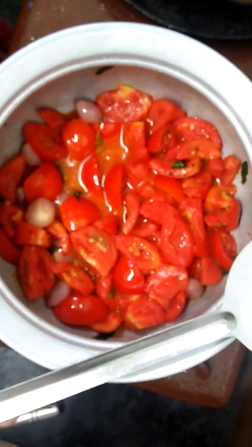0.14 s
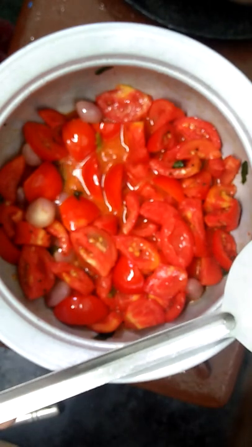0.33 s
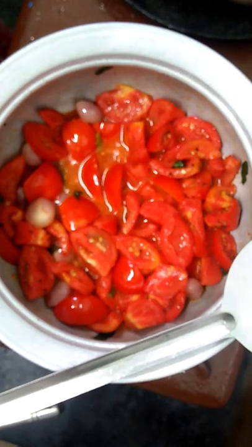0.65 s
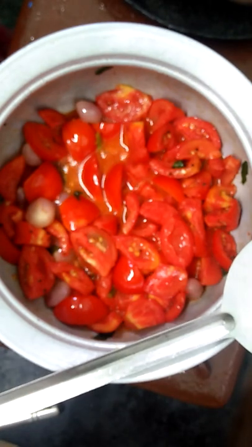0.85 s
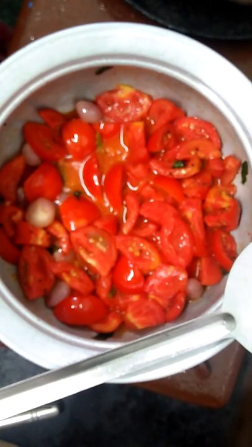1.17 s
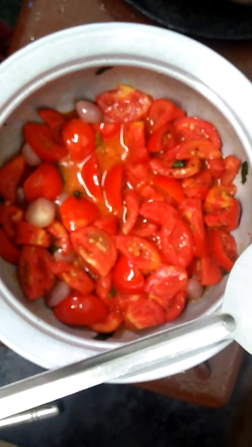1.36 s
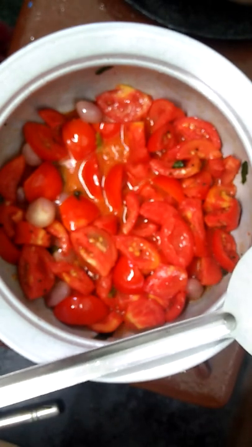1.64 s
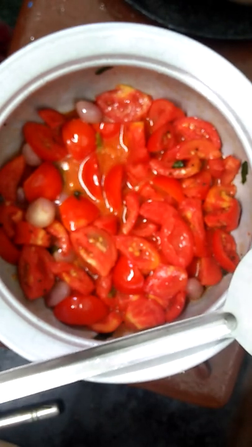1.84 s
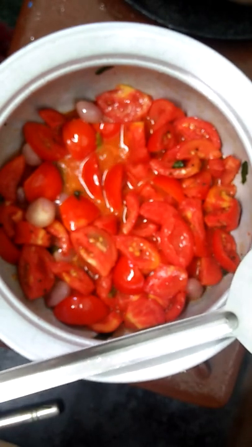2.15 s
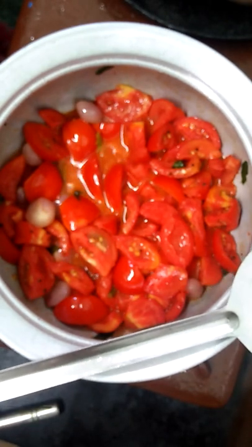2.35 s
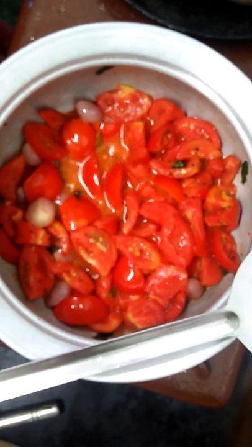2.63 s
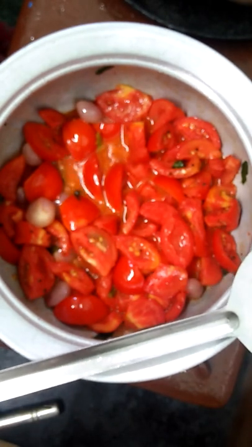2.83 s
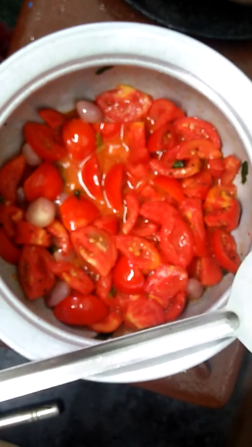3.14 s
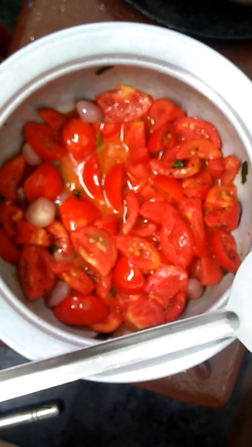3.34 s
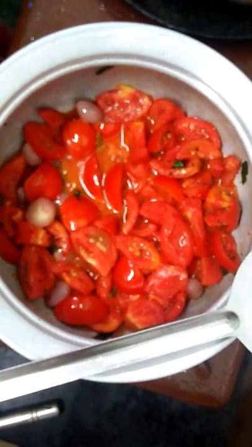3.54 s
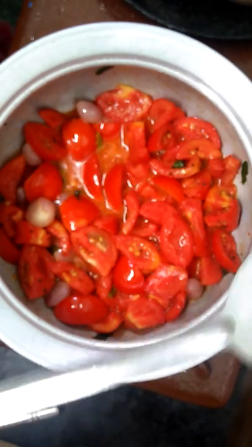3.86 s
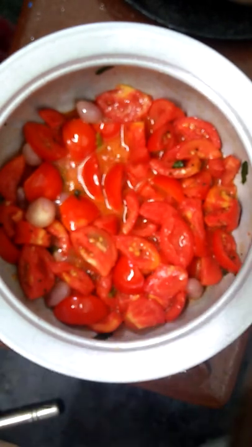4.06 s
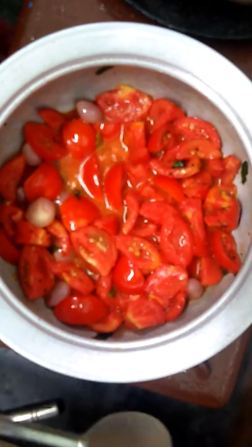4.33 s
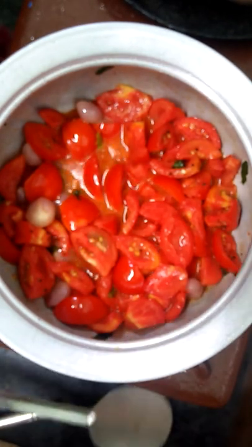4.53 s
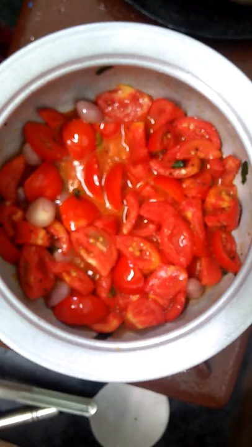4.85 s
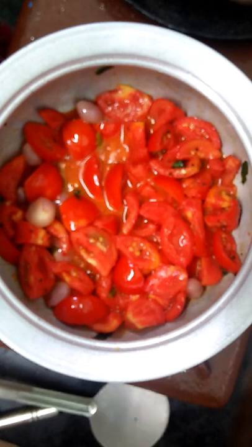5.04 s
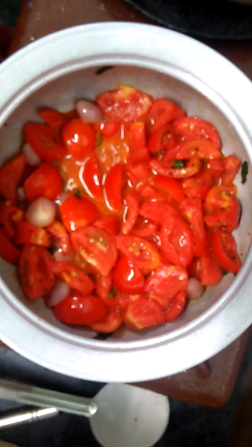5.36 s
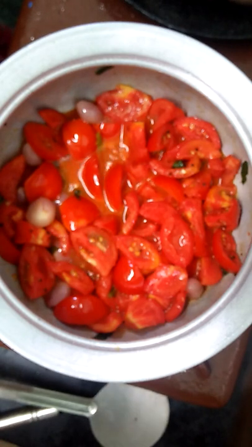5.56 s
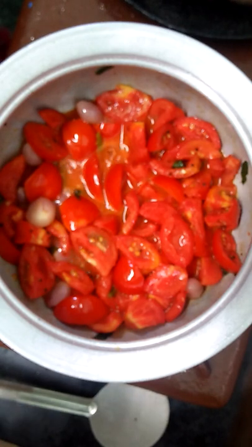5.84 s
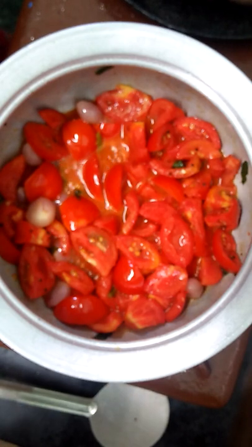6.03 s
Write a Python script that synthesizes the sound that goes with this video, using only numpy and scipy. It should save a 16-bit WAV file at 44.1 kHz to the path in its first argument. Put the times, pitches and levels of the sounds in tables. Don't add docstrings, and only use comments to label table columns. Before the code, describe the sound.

A metal ladle clinks on a pot rim, crows caw outside, then steel clatters onto a stone counter in an echoing kitchen.

```python
import sys
import numpy as np
from scipy import signal
from scipy.fft import rfft, irfft
from scipy.io import wavfile
from scipy.ndimage import uniform_filter1d

SR = 44100
rng = np.random.default_rng(int(sys.argv[2]) if len(sys.argv) > 2 else 0)


def master(y):
    cut = np.clip(np.atleast_2d(y).T, -1, 1)
    pcm = np.round(cut * 32767)
    wavfile.write(sys.argv[1], SR, pcm.astype(np.int16))


def to_linear_factor(level_db):
    exponent = np.asarray(level_db, float) / 20
    return 10 ** exponent


N = 273002

# f/Hz, level/dB per Hz
CRACK = [(180, -44.5), (300, -22), (353, -23.5), (573, -7.5), (1010, -7.5), (1250, -7.5), (2590, -4),
         (3630, -7.5), (9610, 4), (14400, -6)]
# f/Hz, level/dB per Hz
DULL_CRACK = [(360, -24.5), (450, -2.5), (700, 9), (1300, -6), (2400, -18), (3200, -37.5)]


def strike(hits, modes, damped_s, crack):
    out, t = np.zeros(N), np.arange(SR // 2) / SR
    for s, blow_db, chatter_s, crack_db in hits:
        fade = np.exp(-t[:SR // 5] / chatter_s)
        sound = np.zeros(len(t))
        for hz, db, t60 in modes:
            chosen = rng.random(len(fade)) < 400 / SR
            clicks = fade * chosen * rng.standard_normal(len(fade)) * 1.027
            clicks[0] = 1
            push = abs(clicks @ np.exp(2j * np.pi * hz * t[:len(fade)]))
            clicks /= np.sqrt(push + 0.22)
            longest = damped_s * min(1, 4000 / hz)
            swing_in = (1 - np.exp(-t * hz)) ** 2
            tone = np.sin(2 * np.pi * hz * t)
            twin = np.sin(2 * np.pi * hz * 1.006 * t) * 0.45
            ring = to_linear_factor(db - 0.5 - 60 * t / min(t60, longest)) * swing_in * (tone + twin)
            sound += signal.fftconvolve(clicks, ring)[:len(t)]
        sound[:len(fade)] += to_linear_factor(crack_db) * fade * coloured(crack, len(fade))
        start = round(s * SR)
        out[start:start + len(t)] += to_linear_factor(blow_db) * sound[:N - start]
    return out


def pot_clinks():
    # t/s, blow level/dB, chatter time/s, crack level/dB
    pot_hits = [
        (0.0, -41.5, 0.0093, 4),
        (.008, -44, 0.033, 7),
        (.031, -50, 0.0067, 8),
        (.043, -50.5, .02, 4),
        (.09, -59, 0.056, 10),
    ]
    thump_hits = [
        (.004, -61.5, 0.038, -43),
    ]
    lift_hits = [
        (3.889, -59, 0.036, -11),
    ]
    # f/Hz, level/dB, time to fall 60 dB/s
    pot_modes = [(1044.5, -7.5, 0.2), (1935, -5.5, 0.2), (2036, -1, .3), (2220, -11, 0.14), (2970, -4, .3),
                 (3890, -15.5, 0.23), (4146, -12.5, .25), (4275, -2, .25), (5330, -4.5, .3), (5814, -7, .3),
                 (6030, -12.5, .3), (6807, -8, .3), (7240, -8, .3), (8280, -6.5, .3), (8680, -3, .3),
                 (9130, -2, .3), (9390, -8, .3), (1515, -10, 0.17)]
    thump_modes = [(270.4, -3, 0.21), (316, -16.5, 0.092), (470, 4, 0.22), (626, -4.5, 0.033),
                   (743, -4, 0.033)]
    lift_modes = [(1288, -10, 0.083), (1642, -0.5, 0.059), (1755, -4.5, 0.11), (1990, 0, 0.102),
                  (2300, -2, 0.048), (2918, -3, .2), (3410, -14.5, 0.053)]
    # f/Hz, level/dB per Hz
    rim_crack = [(180, -45), (300, -12), (832, -14), (1010, -9), (2030, -6.5), (3630, -10), (4140, -7),
                 (4860, -14), (9000, -6), (14400, -24)]
    clinks = strike(pot_hits, pot_modes, .12, rim_crack)
    thump = strike(thump_hits, thump_modes, .2, DULL_CRACK)
    lift = strike(lift_hits, lift_modes, 0.063, rim_crack)
    return clinks + thump + lift


def resting():
    # t/s, blow level/dB, chatter time/s, crack level/dB
    rest_hits = [
        (4.703, -54, 0.002, -5),
        (4.711, -37, 0.002, -18),
        (4.724, -54, .03, 6.5),
        (4.757, -42, .002, -13),
    ]
    slide_hits = [
        (4.727, -56.5, 0.067, -10.5),
        (4.745, -57, 0.046, -8.5),
    ]
    # f/Hz, level/dB, time to fall 60 dB/s
    rest_modes = [(594.6, -4, 0.37), (566.6, -13.5, 0.04), (915, -14, 0.15), (1142, -16.5, 0.11),
                  (1443, -22.5, .1)]
    slide_modes = [(2190, -2, 0.2), (1380, -8.5, 0.13), (3640, -22.5, .25), (7610, -10.5, 0.11),
                   (8805, -5.5, 0.15), (9950, -10.5, .1), (11700, -13, 0.1), (12030, -12.5, .1)]
    touches = strike(rest_hits, rest_modes, .45, DULL_CRACK)
    soft = signal.sosfilt(signal.butter(4, 1700, fs=SR, output="sos"), touches)
    return soft + strike(slide_hits, slide_modes, 0.24, CRACK)


def stone_clatter():
    # t/s, blow level/dB, chatter time/s, crack level/dB
    drop_hits = [
        (4.786, -38, 0.034, 1),
        (4.806, -43, 0.027, 4),
        (4.826, -45.5, 0.041, -3),
        (4.88, -54.5, 0.032, -5),
    ]
    rock_hits = [
        (4.921, -44.5, 0.082, 0.0051),
        (4.934, -41.5, 0.051, 0.004),
        (4.95, -43.5, 0.047, 0),
        (4.972, -40.5, 0.012, 0.0026),
    ]
    # f/Hz, level/dB, time to fall 60 dB/s
    drop_modes = [(1008.5, -6.5, .3), (2580, -10, .2), (2770, -16.5, 0.084), (3964.5, -19, 0.13),
                  (5280, -16, .3), (7160, -17.5, .2), (7680, -9, .3), (8800, -5, .3), (9270, -3, .3),
                  (9840, -2, .3), (9950, 4.5, .4), (10240, -6.5, .3), (11460, -1.5, .3), (12100, 4.5, .3),
                  (12200, -7, .2), (13600, -9, .2)]
    rock_modes = [(891, -15.5, 0.044), (2120, -23.5, 0.12), (2706, -17, .25), (4056, -17, 0.074),
                  (4870, -12, 0.13), (6728, -2, .3), (6920, -15.5, .3), (7400, -2, .3), (7700, -11.5, .3),
                  (8700, -11.5, .2), (9020, -7.5, .2), (9260, -3, .2), (9520, -9.5, .2), (10500, -4, .2),
                  (11400, -9.5, .2), (12300, -7.5, .2), (12500, -3.5, .2), (13300, -11, .2)]
    return strike(drop_hits, drop_modes, 0.075, CRACK) + strike(rock_hits, rock_modes, 0.098, CRACK)


def small_ticks():
    # t/s, blow level/dB, chatter time/s, crack level/dB
    tick_hits = [
        (5.272, -56.5, 0.048, -8),
    ]
    tink_hits = [
        (5.423, -50.5, 0.027, -19),
        (5.74, -64, 0.0077, -18.5),
    ]
    scuff_hits = [
        (5.5, -81.5, 0.14, 4.5),
        (5.765, -70.5, 0.07, 2.2),
    ]
    # f/Hz, level/dB, time to fall 60 dB/s
    tick_modes = [(9390, 0, .1), (9600, 6.5, .1), (9100, 1, .1), (8800, -19, .1), (11000, -10, .1)]
    tink_modes = [(10160, 2, .3), (10350, -7, .2), (10090, -9, .2), (9800, -4, .2), (13890, -14, .1)]
    scuff_modes = [(2770, -7, .1), (1940, 0.5, 0.088)]
    # f/Hz, level/dB per Hz
    scuff_crack = [(1600, 6.5), (2400, 8), (3400, -5), (4500, -12)]
    tick = strike(tick_hits, tick_modes, 0.027, CRACK)
    tinks = strike(tink_hits, tink_modes, 0.067, CRACK)
    return tick + tinks + strike(scuff_hits, scuff_modes, .1, scuff_crack)


def hollow_knocks():
    # t/s, blow level/dB, chatter time/s, crack level/dB
    knock_hits = [
        (5.762, -60.5, 0.017, -8.5),
        (5.84, -57, 0.00365, 1),
        (5.881, -50, 0.011, 8),
        (5.905, -66, 0.015, -5),
        (6.018, -60, 0.011, -18),
    ]
    blip_hits = [
        (.924, -58.5, 0.0058, -15.5),
        (4.134, -70.5, 0.0089, -9),
        (5.28, -59.5, 0.026, -10),
    ]
    # f/Hz, level/dB, time to fall 60 dB/s
    knock_modes = [(446.7, -0.5, 0.4), (588, -1.5, 0.056), (640, -1, 0.058), (822, -18, 0.04),
                   (1125, 3.5, 0.0155), (1340, -5.5, 0.05), (1716, -15, 0.045), (2200, -14.5, 0.036),
                   (2605, -21, 0.036)]
    blip_modes = [(604, -1.4, 0.12), (926, -2, 0.022)]
    knocks = strike(knock_hits, knock_modes, 0.44, DULL_CRACK) + strike(blip_hits, blip_modes, 0.089, DULL_CRACK)
    return signal.sosfilt(signal.butter(4, 3000, fs=SR, output="sos"), knocks)


def crows():
    # t/s, level/dB, pitch f/Hz, throat scale (1 = usual)
    near_path = [
        (2.285, -66, 498, 0.96),
        (2.32, -53.5, 517, 1),
        (2.34, -55, 525.2, 1.0),
        (2.385, -48.5, 549.4, 1.01),
        (2.42, -50.5, 546, 1.02),
        (2.46, -53, 523.6, .99),
        (2.52, -53, 502.7, 0.98),
        (2.58, -63, 480.5, 0.96),
    ]
    hoarse_path = [
        (1.15, -72, 646, 1.07),
        (1.21, -51.5, 625, 1.14),
        (1.24, -51.5, 600, 1.09),
        (1.29, -52, 559, 1.06),
        (1.315, -60, 560.4, 1.03),
        (1.33, -55, 548.7, .99),
        (1.4, -66, 527, 0.95),
        (1.52, -72, 495.5, 0.93),
    ]
    # t/s, hold time/s, level/dB, throat scale
    far_calls = [
        (0.82, 0.06, -70.5, 0.88),
        (1.665, 0.017, -72.5, 0.945),
        (3.2, 0.043, -72.5, 0.93),
        (3.556, 0.087, -76, 0.96),
        (4.139, 0.17, -69.5, 1.0),
        (5.211, 0.24, -75, 0.97),
    ]
    # f/Hz, width/Hz, level/dB
    near_throat = [(1090, 520, -16), (1630, 390, 7.5), (2097, 455, 3.5), (2570, 460, -27),
                   (4000, 2100, -27)]
    hoarse_throat = [(780, 216, 3), (1080, 610, -3), (1640, 720, -2.5), (2380, 480, -0.5), (2830, 500, -23),
                     (4350, 670, -29.5)]
    far_throats = [
        [(2520, 860, -2), (3740, 490, -20)],
        [(2038, 150, 1.85), (2495, 660, -4)],
        [(1930, 200, 0), (2350, 590, 0)],
        [(1800, 230, -11), (1940, 250, -1)],
        [(900, 200, 0), (1870, 210, -8.5)],
        [(1860, 360, 2), (1182, 87, 8.5)],
    ]
    # t/s, swell level/dB
    near_bursts = [(2.304, 2.5), (2.319, 13), (2.342, 6), (2.363, 10), (2.372, 11), (2.393, 10.5),
                   (2.411, 8), (2.428, 7), (2.441, 14.5), (2.461, 7.5), (2.474, 7), (2.487, 10),
                   (2.505, -1), (2.517, 14), (2.54, 8), (2.547, -6), (2.56, 16)]
    hoarse_bursts = [(1.19, 5.5), (1.212, 4.2), (1.23, 5), (1.245, 6.5), (1.254, 6.6), (1.273, 7),
                     (1.288, 8.7), (1.302, 5), (1.328, 7.1), (1.336, 5.16), (1.349, 4.4), (1.361, 9),
                     (1.379, 5.5), (1.4, 3.9), (1.422, 6), (1.455, 5.2), (1.5, 5)]
    near = caw(near_path, near_throat, near_bursts, rough=.4)
    hoarse = caw(hoarse_path, hoarse_throat, hoarse_bursts, rough=.58)
    far = sum(caw(far_caw(*call), throat, [], rough=0.87) for call, throat in zip(far_calls, far_throats))
    return near + hoarse + far


def caw(rows, throat, bursts, rough):
    s, level_db, pitch_hz, scale = np.transpose(rows)
    t = np.arange(s[0], s[-1], 1 / SR)
    stretch = np.interp(t, s, scale)
    clock = np.cumsum(stretch)
    even = np.arange(int(clock[-1]))
    jitter = 1 + 0.056 * rough * drift(150, size=len(even))
    pitch = np.interp(even, clock, np.interp(t, s, pitch_hz) / stretch) * jitter
    phase = np.cumsum(pitch / SR)
    pulses = rms_one(np.diff(np.floor(phase), prepend=0))
    breath = rng.standard_normal(len(even)) * (phase % 1 < .5)
    source = (1 - rough) * pulses + rough * breath
    voice = np.interp(clock, even, resonate(source, throat))
    chest = signal.sosfiltfilt(signal.butter(2, 1900, fs=SR, output="sos"), voice)
    voice = voice - chest * np.clip(10.4 * (stretch - 1), 0, .8)
    edges = np.minimum(1, np.minimum(t - s[0], s[-1] - t) / 0.0046)
    out, start = np.zeros(N), round(s[0] * SR)
    out[start:start + len(t)] = rms_one(voice * throbs(bursts, t)) * to_linear_factor(np.interp(t, s, level_db)) * edges
    return out


def throbs(rows, t):
    width_s = 0.0029
    return to_linear_factor(sum(db * np.exp(-((t - s) / width_s) ** 2) for s, db in rows))


def far_caw(s, hold_s, db, scale):
    pitch_hz, attack_s, release_s, edge_db, sag = 600, .03, .06, -33, 0.046
    end = s + hold_s
    return [(s - attack_s, db + edge_db, pitch_hz, scale),
            (s, db, pitch_hz, scale),
            (end, db, pitch_hz, scale),
            (end + release_s, db + edge_db, pitch_hz, scale - sag)]


def kitchen(x):
    # f/Hz, time to fall 60 dB/s
    echo_times = [(200, 0.15), (1000, 0.63), (4000, 0.48), (9000, 0.47), (14000, 0.3)]
    t = np.arange(SR) / SR
    edges = 150 * 2.0 ** np.arange(8)
    edges[-1] = .45 * SR
    tail = 0
    for low, high in zip(edges, edges[1:]):
        octave = signal.butter(2, [low, high], "band", fs=SR, output="sos")
        dying = to_linear_factor(-60 * t / at_hz(echo_times, np.sqrt(low * high)))
        tail = tail + signal.sosfilt(octave, rng.standard_normal((2, SR))) * dying
    tail = rms_one(tail * np.minimum(1, t / 0.0014)) / np.sqrt(SR)
    return signal.fftconvolve(x[None], tail, axes=1)[:, :N]


def shut_gate(x):
    open_db, depth_db = -72, -6.5
    level_db = 10 * np.log10(uniform_filter1d(x ** 2, size=SR // 30) + 1e-12)
    return x * to_linear_factor(depth_db / (2 + np.exp((level_db - open_db) / 3.0)))


def rumble():
    # f/Hz, width/Hz, level/dB
    engine_modes = [(84, 22, 8), (123, 36, -3), (163.1, 60, -14.5), (58.35, 17, -15), (35.66, 48, -23),
                    (203, 45, -18), (290, 160, -24)]
    # t/s, hold time/s, level/dB
    surges = [(0.0, 0.14, -59.5), (.26, 0.026, -51.5), (.42, 0.082, -54), (.63, 0.054, -53.5),
              (.76, 0.17, -59.5), (1.38, 0.012, -63.5), (1.5, 0.36, -69), (1.77, 0.087, -60),
              (2.02, 0.007, -70), (2.1, 0.0084, -76), (2.3, 0.026, -61.5), (2.43, 0.018, -65),
              (2.58, 0.0085, -67.5), (2.79, .01, -76), (2.98, .01, -65), (3.09, 0.0236, -62.5),
              (3.2, 0.14, -54.5), (3.5, 0.0084, -57.5), (3.62, 0.36, -59.5), (3.9, 0.11, -58),
              (4.6, 0.2, -62.5), (4.82, 0.0123, -66), (5.16, 0.0066, -72.5), (5.33, 0.11, -59.5),
              (5.62, 0.064, -69), (6.06, 0.0033, -66.5), (6.16, 0.0069, -64.5)]
    drone = rms_one(resonate(rng.standard_normal(N), engine_modes))
    slow = np.sqrt(uniform_filter1d(drone ** 2, size=SR // 14) + 1.0)
    gain = np.hypot(swells(surges, rise_db_s=217.5, fall_db_s=150), to_linear_factor(-83))
    return gain * rms_one(drone / slow)


def street_air():
    # t/s, level/dB
    street = [(0, -58.5), (.3, -66.5), (.42, -71), (1.35, -73), (1.62, -70), (2.1, -72), (3.0, -70),
              (3.45, -68.5), (3.92, -67), (4.05, -68.5), (4.5, -71), (4.68, -63.5), (5.15, -72),
              (5.3, -71.5), (5.7, -71), (6.19, -72.5)]
    # f/Hz, level/dB per Hz
    air_spectrum = [(88, -17.5), (150, -2), (220, -24), (274, -4), (378, -20.5), (413, -7.5), (522, -9.5),
                    (623, -5), (953, -10.5), (1170, -12), (1370, -15.5), (1900, -17), (5000, -42),
                    (6500, -61), (11000, -120)]
    # f/Hz, width/Hz, level/dB
    hums = [(268.5, 16, -10), (485, 21, -18), (607.5, 21, -5.5), (1159, 38, -13.5)]
    s, db = np.transpose(street)
    air_db = np.interp(np.arange(N) / SR, s, db)
    drones = resonate(rng.standard_normal(N), hums) * to_linear_factor(29.5 + 2.5 * drift(8))
    return to_linear_factor(air_db + 2.1 * drift(6.3)) * (coloured(air_spectrum, N) + drones)


def gated_hiss():
    # t/s, hold time/s, hiss level/dB
    openings = [(0.0, 0.28, -66.5), (.83, 0.042, -85), (1.22, 0.14, -73.5), (1.67, .01, -90),
                (1.8, 0.014, -84), (1.9, 0.024, -76.5), (2.21, .01, -94), (2.36, 0.19, -76.5),
                (3.24, 0.0091, -84), (3.5, .01, -95), (3.91, 0.059, -75.5), (4.18, 0.049, -82),
                (4.39, .01, -84), (4.58, 0.23, -82.5), (4.8, 0.4, -61.5), (5.27, 0.092, -70.5),
                (5.42, 0.13, -71), (5.765, 0.089, -63), (5.88, 0.037, -86), (6.16, .01, -90.5)]
    # f/Hz, level/dB per Hz
    open_hiss = [(3500, -20.5), (4500, -23), (5600, -13), (6700, -7), (8700, 2), (10000, -3),
                 (11500, -10.5), (13700, -10.5), (14400, -18.5)]
    # f/Hz, level/dB per Hz
    leak_hiss = [(2060, -34), (3500, 0), (4410, -2.5), (4680, -1), (10800, -1.5), (13700, -7),
                 (14400, -4.5)]
    gate = swells(openings, rise_db_s=317, fall_db_s=179)
    return [gate * coloured(open_hiss, N) + to_linear_factor(-87.5) * coloured(leak_hiss, N) for _ in range(2)]


def background():
    mid, side = gated_hiss()
    wander = to_linear_factor(-92) * coloured([(15, -2.0), (45, -6.5)], N)
    return rumble() + wander + street_air() + mid, side


def swells(rows, rise_db_s, fall_db_s):
    t = np.arange(N) / SR
    power = 0
    for s, hold_s, db in rows:
        early, late = np.maximum(s - t, 0), np.maximum(t - s - hold_s, 0)
        power = power + to_linear_factor(db - rise_db_s * early - fall_db_s * late) ** 2
    return np.sqrt(power)


def rms_one(x):
    return x / np.sqrt(np.mean(x ** 2) + 1e-20)


def at_hz(points, hz):
    f, value = np.transpose(points)
    return np.interp(np.log(hz), np.log(f), value)


def drift(rate, size=N):
    r = np.exp(-2 * np.pi * rate / SR)
    noise = rng.standard_normal(size + 20000)
    return rms_one(signal.lfilter([1], [1, -2 * r, r * r], noise)[20000:])


def coloured(spectrum, size):
    hz = np.maximum(np.fft.rfftfreq(size, 1 / SR), 1)
    inside = (hz > spectrum[0][0]) & (hz < spectrum[-1][0])
    return rms_one(irfft(rfft(rng.standard_normal(size)) * to_linear_factor(at_hz(spectrum, hz)) * inside, size))


def resonate(x, peaks):
    out = 0
    for k, (hz, width, db) in enumerate(peaks):
        r = np.exp(-np.pi * width / SR)
        top = [(1 - r * r) / 2, 0, (r * r - 1) / 2]
        bottom = [1, -2 * r * np.cos(2 * np.pi * hz / SR), r * r]
        y = signal.lfilter(top, bottom, signal.lfilter(top, bottom, x))
        out = out + (-1) ** k * to_linear_factor(db) * y
    return out


def scene():
    steel = pot_clinks() + stone_clatter() + small_ticks() + hollow_knocks()
    rest, birds = resting(), crows()
    echo, other = kitchen(to_linear_factor(-0.5) * birds + to_linear_factor(-1.0) * steel + to_linear_factor(-6.5) * rest)
    floor, hiss = background()
    mid = shut_gate(to_linear_factor(-1.5) * birds + steel + rest + echo) + floor
    apart = shut_gate(other) * to_linear_factor(-8.5) + to_linear_factor(-4.5) * hiss
    side = signal.sosfilt(signal.butter(4, [5530, 12000], "band", fs=SR, output="sos"), apart)
    return np.array([mid + side, mid - side])


def top_cut(x):
    return signal.sosfilt(signal.butter(12, 14760, fs=SR, output="sos"), x)


def record(dry):
    dull = signal.sosfilt(signal.ellip(10, .3, 45, 14300, fs=SR, output="sos"), dry)
    return top_cut(dull)


dry = scene()
out = record(dry)
master(out)
```